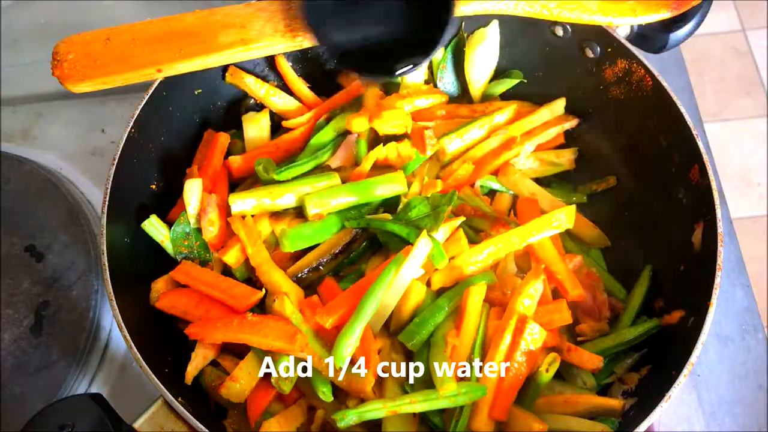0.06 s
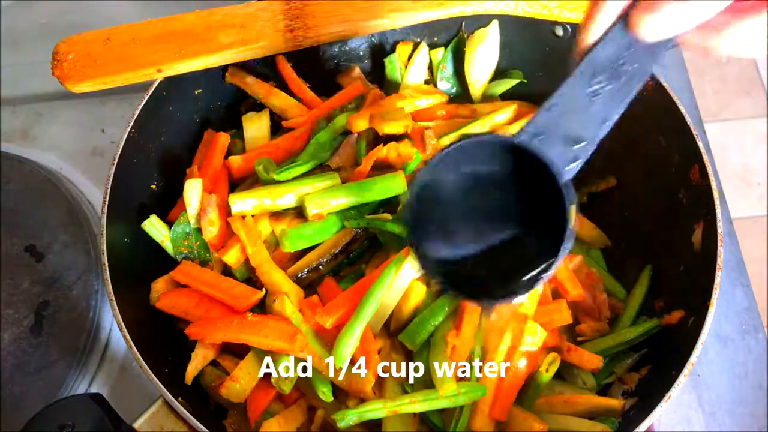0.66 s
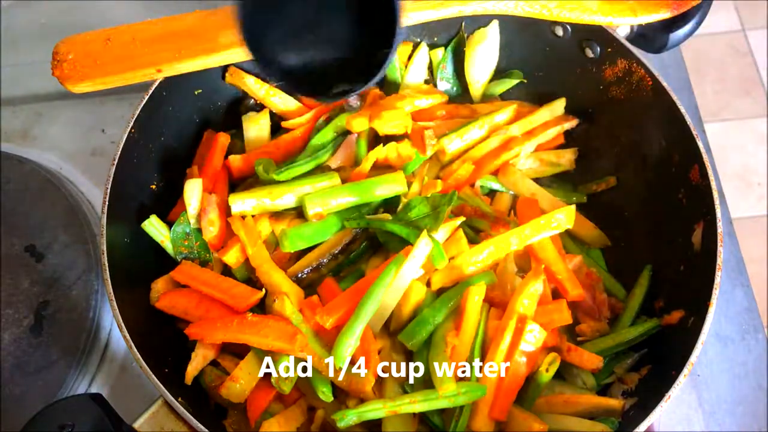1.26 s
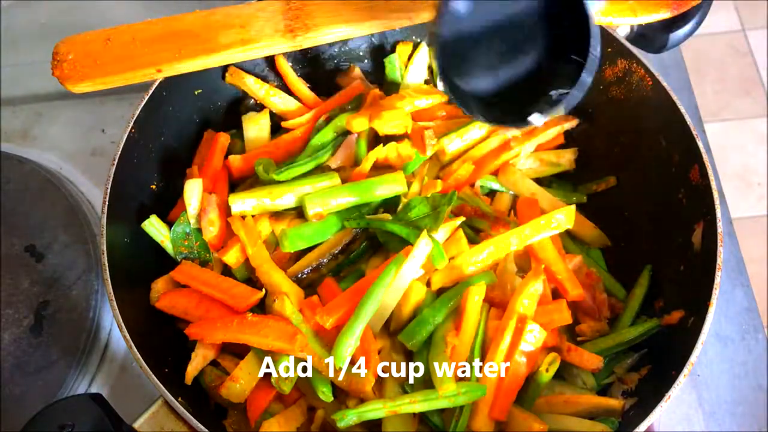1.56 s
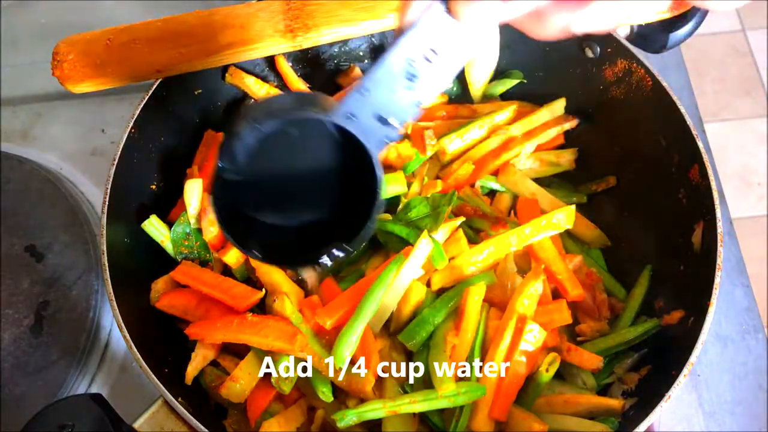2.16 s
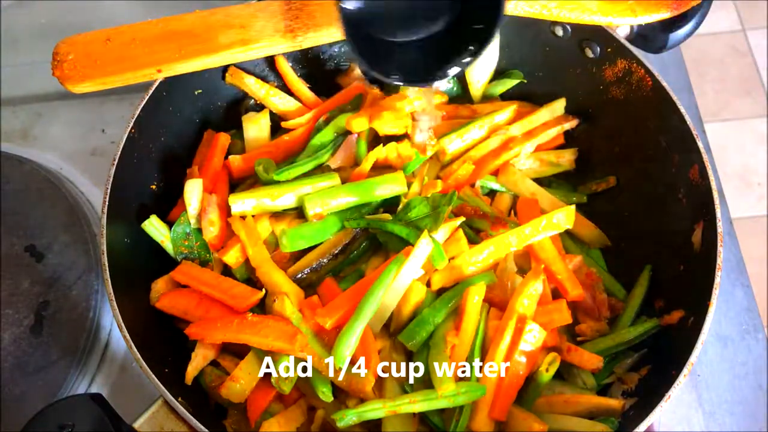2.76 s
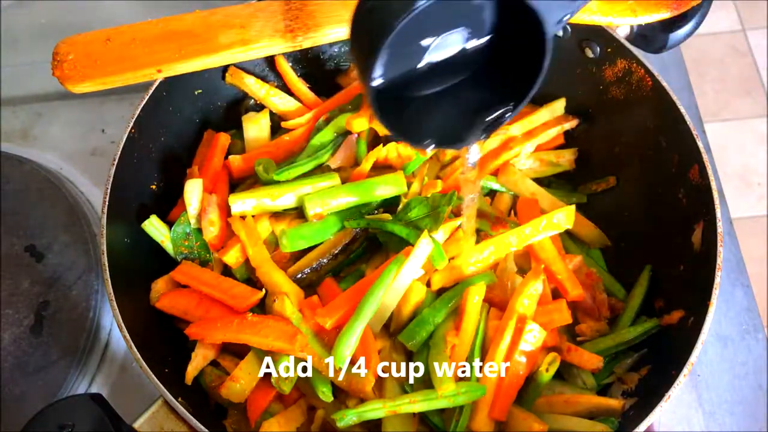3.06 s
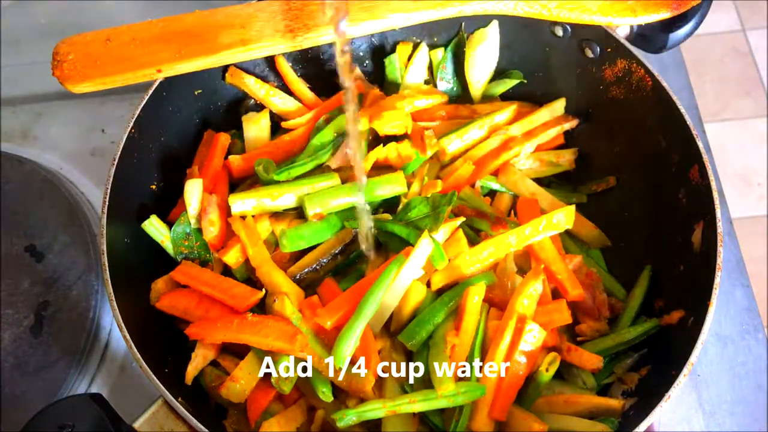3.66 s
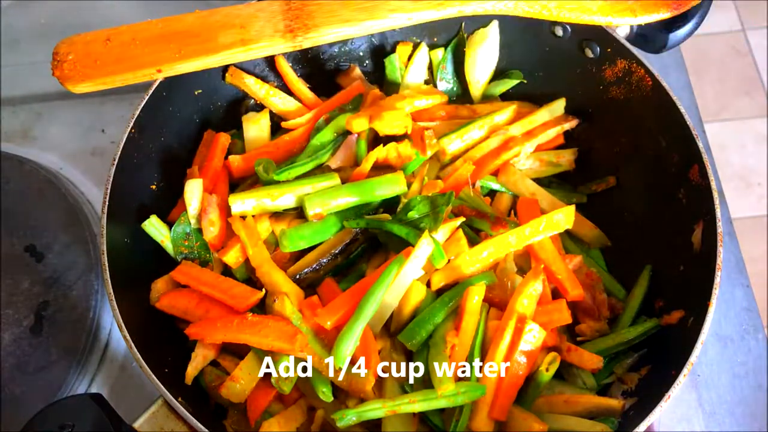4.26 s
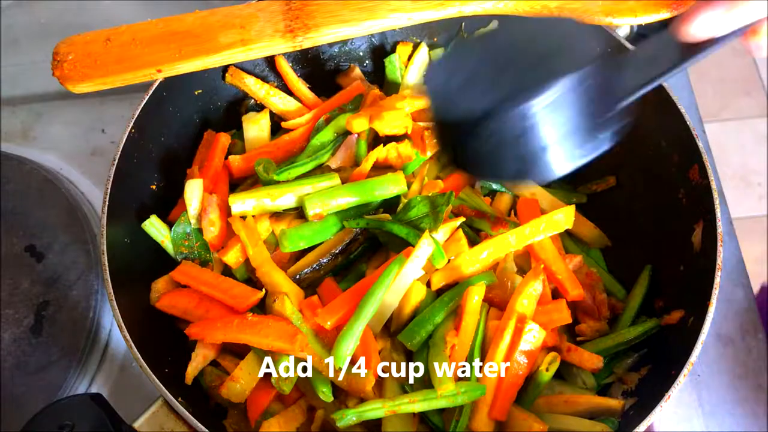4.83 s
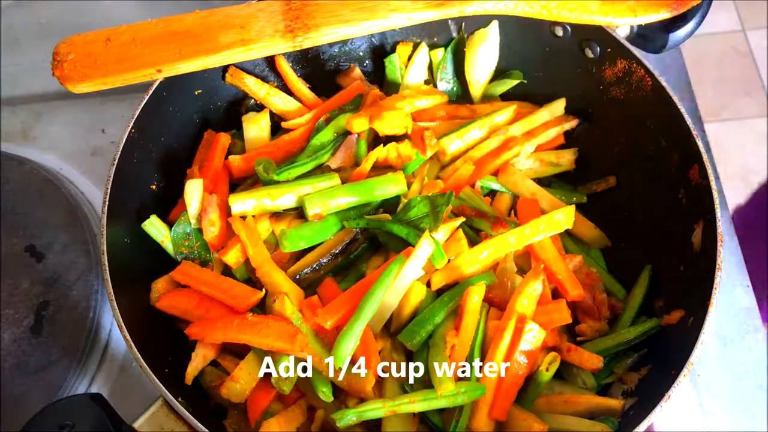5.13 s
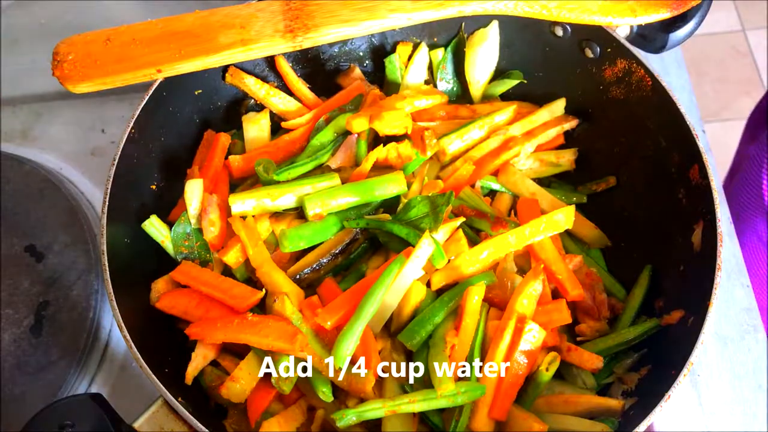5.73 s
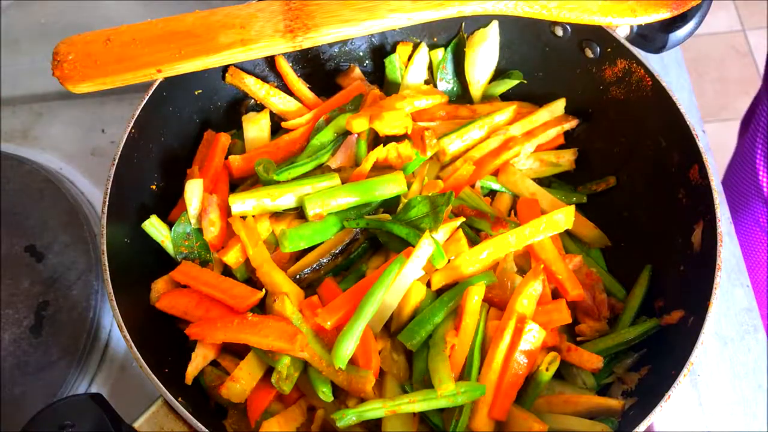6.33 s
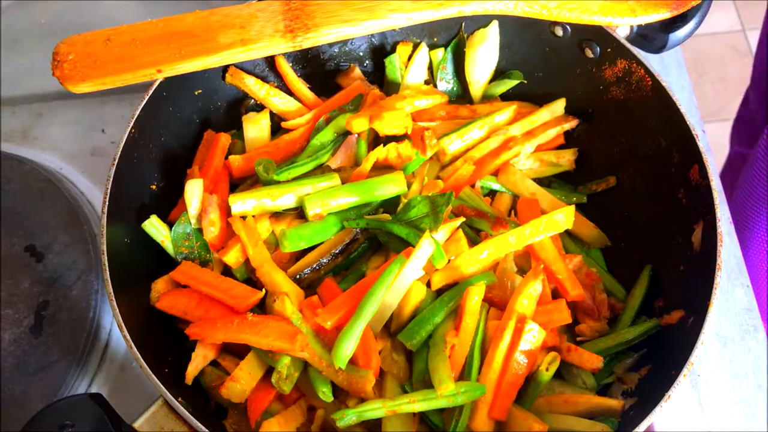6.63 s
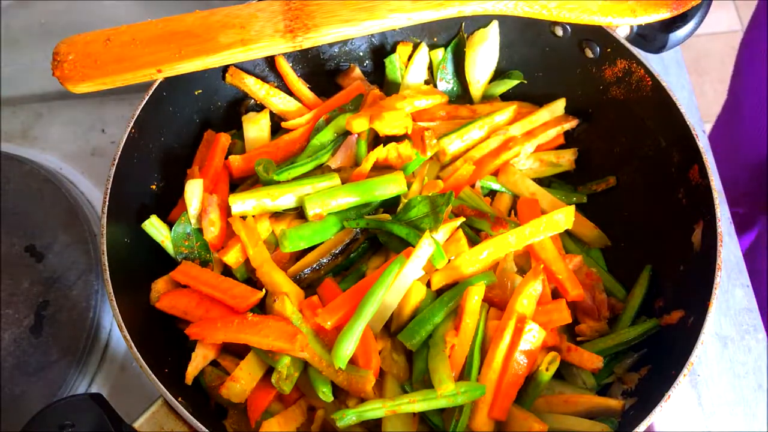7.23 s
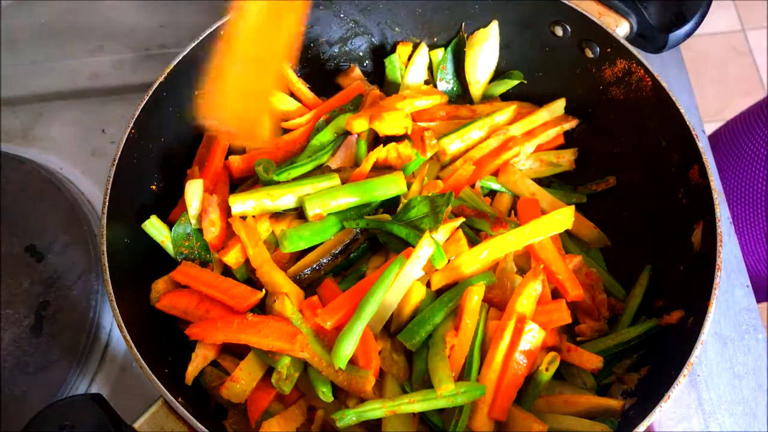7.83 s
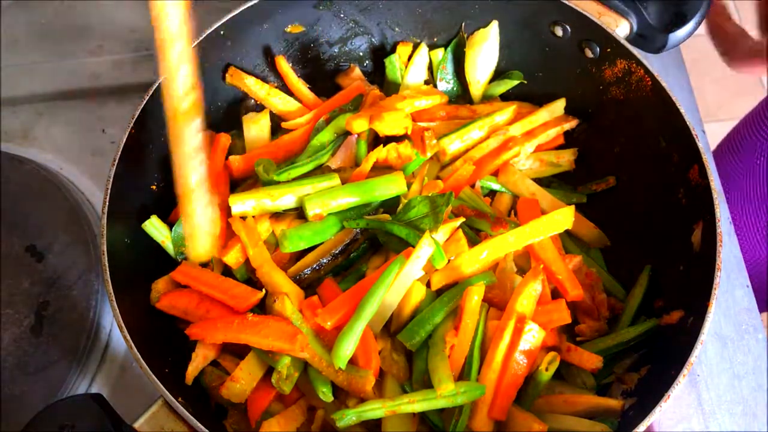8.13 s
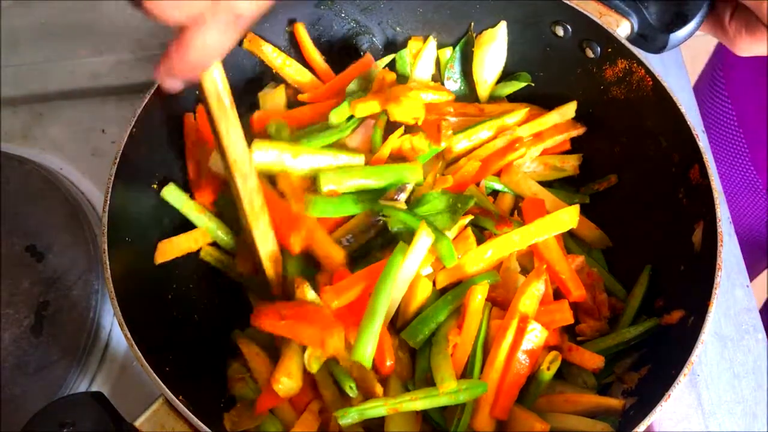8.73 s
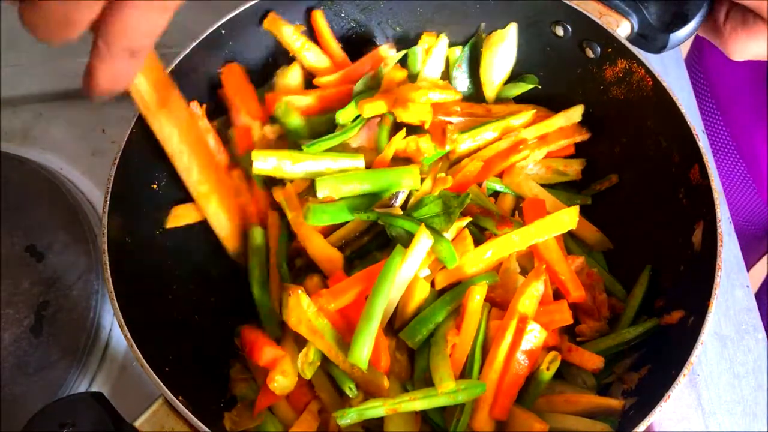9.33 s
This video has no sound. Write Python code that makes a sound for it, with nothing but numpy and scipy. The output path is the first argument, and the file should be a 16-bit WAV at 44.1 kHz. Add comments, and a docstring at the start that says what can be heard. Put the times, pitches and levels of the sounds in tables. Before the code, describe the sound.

Water sizzles and spits in a hot wok, slowly calming, as a plastic cup is set down and a wooden spatula knocks the pan.

```python
"""In a small kitchen, over a softly rumbling stove, a little water is poured on vegetables in a hot wok.
It boils, crackles and spits on the metal, then slowly calms down; the plastic measuring cup glugs once.
At about 6 s the cup is put down on the worktop with a thud that sets the wok ringing. It rocks and slips,
then its handle clacks. Near the end a wooden spatula pushes through the vegetables and knocks the pan."""
import sys
import numpy as np
from scipy import signal
from scipy.fft import rfft, irfft
from scipy.io import wavfile

SR = 44100
rng = np.random.default_rng(int(sys.argv[2]) if len(sys.argv) > 2 else 0)


def store_wav(level_fs):
    """Save 16-bit WAV to argv[1]."""
    pcm = np.round(np.clip(np.atleast_2d(level_fs), -1, 1) * 32767)
    wavfile.write(sys.argv[1], SR, pcm.T.astype(np.int16))


N = 422919
TIME_S = np.arange(N) / SR


def from_db(db):
    """Turn decibels into a number to multiply a sound by."""
    return 10 ** (np.asarray(db) / 20)


def rms_one(x):
    """Scale a signal so that its average strength (rms) is 1."""
    return x / np.sqrt(np.mean(x ** 2) + 1e-20)


def add(track, start_s, sound):
    """Mix a sound into the track at a given time."""
    at = int(np.clip(round(start_s * SR), 0, N - 1))
    track[at:at + len(sound)] += sound[:N - at]


def through(x, response):
    """Give every sample of x the same response, such as a tone colour or an echo."""
    return signal.oaconvolve(x, response)[:len(x)]


def filtered(x, edge_hz, kind, order=2):
    """Keep the "low" part of a sound, the "high" part, or a "band" between two edges."""
    return signal.sosfilt(signal.butter(order, edge_hz, kind, fs=SR, output="sos"), x)


def colour(spectrum, peaks=(), size=4096):
    """The response to one click that has the given tone curve, with peaks and dips on top; energy 1."""
    hz = np.maximum(np.arange(size // 2 + 1) * SR / size, 1)
    points = np.array(spectrum)
    db = np.interp(np.log(hz), np.log(points[:, 0]), points[:, 1])
    for centre, width, height in peaks:
        db = db + height / (1 + (2 * (hz - centre) / width) ** 2)
    # move the energy as early as it can go (minimum phase), so clicks stay sharp
    cepstrum = irfft(np.log(from_db(db)))
    cepstrum[1:size // 2] *= 2
    cepstrum[size // 2 + 1:] = 0
    response = irfft(np.exp(rfft(cepstrum)))
    return response / np.linalg.norm(response)


def drift(rate_hz):
    """A smooth random wobble, about 1 in size; a higher rate wobbles faster."""
    r = np.exp(-80 * np.pi * rate_hz / SR)
    slow = signal.lfilter([1], [1, -2 * r, r * r], rng.standard_normal(N // 40 + 2002))[2000:]
    return np.interp(np.arange(N) / 40, np.arange(len(slow)), rms_one(slow))


def ring(clicks, hz, fade_s):
    """Each click starts a pure tone. Here and below, fade_s is the time to die away by 60 dB."""
    r, turn = from_db(-60 / (fade_s * SR)), 2 * np.pi * hz / SR
    return signal.lfilter([0, np.sin(turn)], [1, -2 * r * np.cos(turn), r * r], clicks + 1e-18)


def struck(notes, detune=0.003):
    """A hit object rings with all its notes; their strength and pitch differ a little at every blow."""
    click, out = signal.unit_impulse(SR), np.zeros(SR)
    for k, (hz, db, fade_s) in enumerate(notes):
        level_luck, pitch_luck = rng.standard_normal(2)
        out += (-1) ** k * from_db(db + level_luck) * ring(click, hz * (1 + detune * pitch_luck), fade_s)
    return out


def dying_noise(fade_s, size=SR):
    """Many tiny echoes that blur together and die away; energy 1."""
    tail = rng.standard_normal(size) * from_db(-60 * np.arange(size) / SR / fade_s)
    return tail / np.linalg.norm(tail)


def random_clicks(per_s, spread_db, largest):
    """Many small clicks and a few large ones, up to `largest` steps of spread_db louder."""
    sizes = from_db(spread_db * np.minimum(rng.exponential(1, N), largest)) * rng.choice([-1, 1], N)
    return rms_one(sizes * (rng.random(N) < per_s / SR))


def chance_times(per_s):
    """Sample positions of events that come at random."""
    return np.flatnonzero(rng.random(N) < per_s / SR)


def pick_between(low, high):
    """A random value; every doubling in the range is equally likely."""
    return low * (high / low) ** rng.random()


def push(peak_s, rise_s, fall_s):
    """A force that grows from 0 to 1 and eases off again."""
    return np.interp(TIME_S, [peak_s - rise_s, peak_s, peak_s + fall_s], [0, 1, 0])


# tone of the stove: pitch_hz, relative_db
STOVE_TONE = [(20, -13), (40, -11), (61, 4.5), (77, -3.5), (98, 2.5), (125, 3), (165, -13), (205, -30),
              (278, 1.5), (345, -12), (390, -8), (460, -10.5), (900, -4.5), (3000, -53.5)]


def stove():
    """The stove rumbles: soft, steady, low noise."""
    return from_db(-57.5) * rms_one(through(rng.standard_normal(N), colour(STOVE_TONE, size=8192)))


# the boil comes up as water gathers in the pan, then sinks to a simmer: time_s, level_db
BOIL_LEVEL = [(0, -43), (.5, -42.5), (1.0, -39.5), (1.7, -39.5), (2.5, -40), (3.4, -41), (4.2, -42.5),
              (5.1, -44), (5.9, -45), (7.0, -46.2), (9.59, -46.5)]
# tone of the boil: pitch_hz, relative_db
BOIL_TONE = [(200, -41), (430, -33), (530, -7), (720, -7), (970, -4.5), (1150, -1.5), (1500, -0.5),
             (1670, -5.5), (2400, -10), (3500, -16), (7000, -39)]
# pitches that the wok's bowl and the air in it boost or weaken: pitch_hz, width_hz, boost_db
BOWL_PEAKS = [(445, 40, -5), (592, 75, 4), (700, 60, -4), (845, 82, 8.8), (968, 50, -5), (1160, 40, 2),
              (1235, 50, 4), (1568, 52, 4.5), (1630, 50, -3), (1912, 75, 3.5), (2172, 60, 2),
              (2390, 120, 2), (4720, 200, 2), (4980, 200, -3), (7600, 500, -1.5), (8350, 400, 2.5)]


def boiling(cycles=8.2, pitch_count=24):
    """Bubbles burst between the vegetables and ring a few cycles each, coloured by the bowl."""
    level_db = np.interp(TIME_S, *np.transpose(BOIL_LEVEL))
    per_s = 3500 * from_db(level_db - level_db.max() + 2 * drift(8))
    bursts = random_clicks(per_s, spread_db=2.5, largest=5.4)
    pitch_choice = rng.integers(0, pitch_count, N)
    bubbles = np.zeros(N)
    for k, hz in enumerate(np.geomspace(480, 4200, pitch_count)):
        bubbles += ring(bursts * (pitch_choice == k), hz, cycles / hz) * hz ** 1.5
    seethe = rms_one(bubbles) + from_db(2.5) * rng.standard_normal(N)
    return from_db(level_db) * rms_one(through(seethe, colour(BOIL_TONE, BOWL_PEAKS)))


# how hard the water fries, dying down as the pan cools; the next five sounds follow it: time_s, vigour_db
VIGOUR_CURVE = [(0.0, -1.5), (0.7, 0), (1.7, -0.5), (2.2, -2), (3.1, -4), (4.1, -8.5), (5.1, -11.5),
                (5.9, -13.5), (7.0, -14), (9.59, -14)]
# tone of the frying: pitch_hz, relative_db
FRY_TONE = [(200, -42), (450, -32), (900, -9), (1800, 1), (2800, 3), (4500, 2), (4900, -1), (5500, -0.5),
            (6800, -2.5), (7600, -9.5), (9500, -27), (16000, -35)]


def frying():
    """Tiny drops flash to steam on the metal: sharp clicks that thin out as the pan cools, over a hiss."""
    vigour_db = vigour()
    per_s = 7000 * from_db(1.1 * (vigour_db - vigour_db.max()))
    crackle = random_clicks(per_s, spread_db=3.4, largest=4.4) + from_db(-1) * rng.standard_normal(N)
    level_db = -39.44 + vigour_db + 1.47 * drift(31)
    return from_db(level_db) * rms_one(through(crackle, colour(FRY_TONE, BOWL_PEAKS)))


def vigour():
    """How hard the water fries at every sample, in dB; 0 is the hardest."""
    return np.interp(TIME_S, *np.transpose(VIGOUR_CURVE))


def fizzles(clicks, fade_s):
    """Each click becomes a tiny burst of hiss."""
    r = from_db(-120 / (fade_s * SR))
    energy = signal.lfilter([1], [1, -r], clicks ** 2 + 1e-18)
    return rms_one(np.sqrt(energy) * rng.standard_normal(N))


# tone of the spray: pitch_hz, relative_db
SPRAY_TONE = [(2000, -51), (5000, -7), (7600, -1), (8500, 3.5), (11500, 3), (12800, 0), (14000, -2.7),
              (16000, -3.7)]


def spray():
    """The finest droplets crackle very high, over a mist that sputters more unevenly as it thins."""
    level_db = -45 + 1.34 * vigour()  # the finest sounds die away fastest
    thinning_db = level_db.max() - level_db
    per_s = 260 * from_db(-0.6 * thinning_db + 4 * drift(14))
    ticks = fizzles(random_clicks(per_s, spread_db=5, largest=3.8), fade_s=0.008)
    sputter_db = 1.1 + 0.07 * thinning_db
    edges_hz = np.geomspace(5000, 16000, 7)
    shared_wobble, mist = drift(70), np.zeros(N)
    for low, high in zip(edges_hz, edges_hz[1:]):
        hiss = filtered(rng.standard_normal(N), [low, high], "band")
        mist += hiss * from_db(sputter_db * (shared_wobble + drift(35)))
    droplets = ticks + from_db(2) * rms_one(mist)
    waver_db = 0.7 * sputter_db * drift(8)
    return from_db(level_db + waver_db) * rms_one(through(droplets, colour(SPRAY_TONE)))


def snapping_bubbles(low_hz=2230, high_hz=12000, cycles=19.3, echo_db=9.5, echo_fade_s=0.073, size=2048):
    """Single small bubbles snap out of the sizzle, each with its own pitch and brief echo in the bowl."""
    out = np.zeros(N)
    fade = from_db(-60 * np.arange(size) / SR / echo_fade_s)
    for at in chance_times(per_s=130):
        hz = pick_between(low_hz, high_hz)
        snap = from_db(echo_db) * rng.standard_normal(size) * fade / np.linalg.norm(fade)
        snap[0] = 1  # the click itself, ahead of its echo
        db = -1.5 * np.log2(hz / low_hz) + 0.99 * rng.standard_normal()
        add(out, at / SR, from_db(db) * ring(snap, hz, cycles / hz))
    return from_db(-49 + 0.45 * vigour()) * rms_one(out)


def steam_jets(low_hz=2600, high_hz=13500, half_width_octaves=0.077):
    """Steam squirts from under the vegetables: narrow hisses, each with its own pitch and length."""
    out, vigour_db = np.zeros(N), vigour()
    t = np.arange(SR // 10) / SR
    for at in chance_times(per_s=12):
        swell_s = pick_between(0.005, 0.013)
        swell = np.exp(-0.5 * ((t - t.mean()) / swell_s) ** 2)
        hz = pick_between(low_hz, high_hz)
        db = -44 + 0.77 * vigour_db[at] - 4 * np.log2(hz / low_hz)  # lower jets are louder
        band_hz = [hz * 2 ** -half_width_octaves, hz * 2 ** half_width_octaves]
        hiss = rms_one(filtered(rng.standard_normal(len(t)), band_hz, "band"))
        add(out, at / SR, from_db(db) * hiss * swell)
    return out


def drop(hz, spread_octaves, fade_s):
    """One drop bursts with a snap and a short spit, which bounce round the bowl."""
    grid_hz = np.geomspace(200, 20000, 30)
    # a hump of energy around the drop's pitch; small drops are higher
    distance = np.log2(grid_hz / hz) / (1.6 * spread_octaves)
    hump_db = -40 * np.log10(1 + distance ** 2) - 10 * np.log10(grid_hz / hz)
    echo_db = 1.5 - 2.5 * np.log2(max(hz / 3000, 1))  # high drops echo less
    burst = dying_noise(fade_s, SR // 10) + from_db(echo_db) * dying_noise(0.1, SR // 10)
    burst[0] = from_db(-2.5)  # the snap
    pop = through(burst, colour(np.column_stack([grid_hz, hump_db]), size=1024))
    return np.sqrt(0.005 * SR) * pop / np.linalg.norm(pop)  # as much energy as 5 ms at strength 1


# the largest drops on the hot metal: start_s, level_db, pitch_hz, spread_octaves, fade_s
BIG_DROPS = [(0.37, -35, 6400, 1.1, .006), (0.8958, -29.5, 1870, 0.57, .012),
             (1.799, -36, 11000, 0.28, .008), (2.0635, -41, 11000, .5, .008),
             (2.2973, -36, 3200, 1.1, .004), (2.503, -37, 10500, 0.48, .008),
             (2.580, -34, 5000, 1.5, 0.0073), (2.633, -41, 3500, 0.53, .005), (2.774, -36, 5000, .7, .008),
             (3.089, -33, 1500, 0.46, .012), (3.2115, -31.5, 3900, 1.1, 0.005),
             (3.216, -34, 9800, 0.45, .005), (3.427, -36.5, 4500, 1.1, .02),
             (3.4816, -41.5, 5800, .4, .006), (3.5252, -31.5, 2500, 0.86, .025),
             (3.546, -34.5, 1700, 0.83, .008), (3.589, -38.5, 6600, 1.2, .007),
             (3.6038, -43, 12500, .4, .005), (3.851, -38, 3480, .25, .008), (3.8755, -41, 13000, .35, .012),
             (3.960, -39, 1600, 0.67, .006), (4.033, -39, 8500, 1.7, .006), (4.082, -34, 2400, 0.6, 0.0069),
             (4.188, -45, 10600, 0.26, .005), (4.2271, -33.5, 2040, 0.7, .007),
             (4.2399, -40, 3500, 1, .006), (4.4965, -47, 11500, 0.65, .005),
             (4.501, -44, 12000, 0.36, .008), (4.5297, -49, 11500, .45, .005),
             (4.544, -41, 9000, 1.1, .005), (4.7492, -36.5, 4700, 0.36, 0.0052),
             (4.9203, -50, 9500, .3, .005), (5.037, -54, 9500, .3, .006), (5.156, -49, 5500, .6, .005),
             (5.343, -45, 6500, 1.4, 0.017), (5.4117, -44, 5430, .3, .007), (5.451, -42, 3700, 0.56, .006),
             (5.5294, -48, 12500, 0.38, .005), (5.5776, -46, 8700, .25, .005),
             (5.596, -35, 1900, 0.54, 0.014), (5.893, -41, 3500, 1.2, 0.013),
             (6.0196, -35.5, 3000, 0.93, .005), (6.263, -42, 1700, 1.2, 0.013),
             (6.571, -34.5, 1740, 0.97, 0.011), (6.6454, -42, 2400, 0.88, 0.0068),
             (6.8636, -43.5, 4500, 0.77, .01), (6.892, -42, 4900, .35, .02), (7.054, -49.5, 7000, 1, .006),
             (7.104, -45.5, 4500, 1.1, .005), (7.2045, -42.5, 4800, 0.099, .008),
             (7.2256, -52, 14800, .12, .005), (7.2562, -37, 4240, 0.8, .005),
             (7.313, -38, 1400, 0.71, .012), (7.3395, -49, 14000, .25, .005),
             (7.361, -45, 4000, 0.97, .005), (7.5456, -48, 5460, .35, .005), (7.6576, -50, 6300, .4, .006),
             (7.683, -48, 5000, .35, .006), (7.7135, -46, 5000, 1.3, .005), (7.8238, -48, 13000, .4, .005),
             (8.0834, -48, 5300, 0.44, .005), (8.198, -45.5, 11000, 0.65, .005),
             (8.3834, -40, 5400, 0.61, 0.0046), (8.4957, -52, 8300, .4, .005),
             (8.7875, -52, 9000, .4, .005), (8.977, -40, 5600, 0.38, 0.0055),
             (9.093, -43.5, 9000, .65, .004)]


def popping_drops():
    """Large drops spit loudly; smaller ones come at random and weaken as the pan cools."""
    out, vigour_db = np.zeros(N), vigour()
    for start_s, db, hz, spread_octaves, fade_s in BIG_DROPS:
        add(out, start_s, from_db(db) * drop(hz, spread_octaves, fade_s))
    for at in chance_times(per_s=9):
        hz = pick_between(4000, 14000)
        db = -45 + 0.82 * vigour_db[at] + 2.6 * rng.standard_normal()
        add(out, at / SR, from_db(db) * drop(hz, spread_octaves=0.36, fade_s=0.0039))
    return out


def gulp(start_s=2.777, start_hz=291, fade_s=0.071):
    """A gulp of air as the water leaves the cup: one soft, low glug that sags in pitch."""
    out, t = np.zeros(N), np.arange(SR // 4) / SR
    hz = start_hz * (0.71 + 0.29 * np.exp(-t / 0.026))
    loudness = from_db(-29 - 60 * t / fade_s) * (1 - np.exp(-t / 0.012))
    add(out, start_s, loudness * np.sin(2 * np.pi * np.cumsum(hz) / SR))
    return out


# tone of the worktop's thud: pitch_hz, relative_db
WORKTOP_TONE = [(40, -43), (120, 5.5), (200, -3), (360, -0.5), (500, 1.5), (650, 7.5), (900, 5.5),
                (1600, 5.5), (2300, 0), (3500, -4), (9000, 19), (16000, 23)]
# hollow notes of the worktop panel and the gaps between them: pitch_hz, width_hz, boost_db
PANEL_PEAKS = [(195, 50, -9), (483, 110, 6), (675, 100, 2), (880, 80, 5), (990, 70, -2), (1120, 80, 7),
               (1410, 200, 3), (1640, 63, 10), (1930, 110, 2)]
# the notes the wok rings with: pitch_hz, relative_db, fade_s
WOK_NOTES = [(113, -9, 0.45), (138, -5, 0.31), (278.4, -9, 1), (397, -4, 0.19), (559, -4, 0.5),
             (690, -6, 0.23), (872, 5, 0.48), (1095, 2, 0.46), (1140, 2, 0.35), (1525, -5, 0.96),
             (1630, -2, 0.22), (1900, -11, 0.5), (2400, -3, .28), (3200, -2, 0.18), (3425, 3.5, 0.16),
             (3530, 0, 0.18), (4220, -6, .24), (4580, -2, 0.23), (4640, -2, .2), (5846, 1, 0.16),
             (5880, -3, 0.2), (6400, -1, .14), (6570, -6, 0.2), (7500, -5, 0.17), (8150, -7, .15),
             (9318, -8, 0.22)]


def dull_blow(cutoff_hz, ring_db, boom_delay_s=0.0139):
    """The worktop thuds, the wok on the stove rings along, and the cabinet below booms late and low."""
    thud = through(dying_noise(fade_s=0.067), colour(WORKTOP_TONE, PANEL_PEAKS))
    thud = filtered(thud, cutoff_hz, "low")
    boom = filtered(dying_noise(fade_s=0.22), [85, 150], "band")
    boom = np.pad(boom, (int(boom_delay_s * SR), 0))[:SR]
    return (from_db(22) * thud / np.linalg.norm(thud)
            + from_db(ring_db - 15) * struck(WOK_NOTES)
            + from_db(11.5) * boom / np.linalg.norm(boom))


# the cup lands, then tips over: start_s, force_db, cutoff_hz, relative_ring_db, hollow_note_db
CUP_LANDINGS = [(5.9338, -26.5, 1800, -2, -31), (5.9414, -25, 1050, -4, -24), (6.125, -51, 750, -2, -43),
                (6.182, -48, 750, -4, -36), (6.207, -39, 150, -16, -55)]
# the notes of the cup's hollow: pitch_hz, relative_db, fade_s
HOLLOW_NOTES = [(462, -16, 0.084), (610, 0.5, 0.087), (688, -9, 0.11)]


def cup_landings(contacts=4, gap_s=0.023, loss_db=5):
    """The cup lands with a hollow note and rocks to rest, each contact weaker and duller than the last."""
    out = np.zeros(N)
    for start_s, force_db, cutoff_hz, ring_db, hollow_db in CUP_LANDINGS:
        add(out, start_s, from_db(hollow_db) * struck(HOLLOW_NOTES))
        for k in range(contacts):
            contact = dull_blow(cutoff_hz * 0.8 ** k, ring_db if k == 0 else ring_db - 8)
            add(out, start_s + k * gap_s, from_db(force_db - k * loss_db) * contact)
    return out


# the cup's slips on the worktop: peak_s, level_db, rise_s, fall_s
CUP_SLIPS = [(5.946, -42, 0.012, 0.075), (6.125, -46.5, 0.18, 0.12), (6.26, -50, .03, 0.068)]
# tone of the scrape: pitch_hz, relative_db
SCRAPE_TONE = [(1000, 2), (2500, -8), (4600, -8.5), (7000, -13), (9400, -6.5), (11000, -4.5), (16000, -16)]
# what rings as the cup slips: pitch_hz, width_hz, boost_db
SCRAPE_PEAKS = [(2500, 120, 7), (3200, 78, 18), (3360, 87, 17), (3550, 110, 7.1), (4220, 80, 12),
                (4770, 98, 18), (5800, 100, 19), (6600, 130, 9), (7560, 130, 10), (8150, 150, 8),
                (8860, 150, 6), (9350, 150, 9)]


def cup_slips():
    """The cup slips over the worktop in a quick run of tiny catches that make it ring roughly."""
    force = sum(from_db(db) * push(peak_s, rise_s, fall_s) for peak_s, db, rise_s, fall_s in CUP_SLIPS)
    chatter = from_db(2.5 * drift(80))
    catches = random_clicks(per_s=2500, spread_db=1, largest=3)
    return through(force * chatter * catches, colour(SCRAPE_TONE, SCRAPE_PEAKS))


# the handle hits the worktop: start_s, level_db
HANDLE_HITS = [(6.3874, -25), (6.3886, -21), (6.3918, -21.5)]
# the short notes of the plastic: pitch_hz, relative_db, fade_s
PLASTIC_NOTES = [(1427, -1, 0.053), (2380, -5, 0.025), (2760, -9, 0.014), (3440, -5.5, 0.0088),
                 (4040, -7.5, 0.0091), (4800, -0.5, 0.0066), (5900, -9, 0.01), (6700, -10, 0.0059),
                 (8600, -19, 0.014), (9800, -13, 0.0081), (11800, -18, .007), (13800, -20, .006)]


def handle_clacks():
    """The cup's handle drops on the worktop, and each hard contact makes the plastic ring briefly."""
    out = np.zeros(N)
    for start_s, db in HANDLE_HITS:
        add(out, start_s, from_db(db) * struck(PLASTIC_NOTES))
    return out


# the spatula pushes through the vegetables: peak_s, force_db
SPATULA_STROKES = [(7.7, -4), (8.38, 0), (8.72, -2.5), (9.1, -3)]
# tone of the pan being rubbed and rocked: pitch_hz, relative_db
RUMBLE_TONE = [(25, -24), (60, 2), (90, 3), (115, 0), (200, -17), (300, -9), (700, -18), (2000, -20),
               (8000, -32)]


def stirring():
    """Wood and vegetables shuffle over the pan and rock it on the stove: a lumpy, low rumble."""
    force = sum(from_db(db) * push(peak_s, rise_s=0.19, fall_s=0.23) for peak_s, db in SPATULA_STROKES)
    bumps = random_clicks(per_s=370, spread_db=4.5, largest=3.4)
    return from_db(-56.5) * force * rms_one(through(bumps, colour(RUMBLE_TONE)))


# the spatula meets the pan: start_s, knock_db, thud_db
SPATULA_HITS = [(7.729, -46, -47), (8.338, -40, -41), (9.1179, -30, -41), (9.1209, -34.5, -38.5),
                (9.269, -40, -58)]
# the notes of the wooden knock: pitch_hz, relative_db, fade_s
WOOD_NOTES = [(290, -17, 0.091), (600, -11, 0.012), (980, -6, 0.037), (1173, 0.5, 0.035), (1410, -5, 0.025),
              (1690, -5, 0.028), (2140, -8, 0.028), (2730, -11, 0.05), (3500, -3, 0.0093),
              (6500, -10, .008)]


def spatula_taps():
    """The wooden spatula knocks the pan and jolts it on the stove, which answers with a short rumble."""
    out = np.zeros(N)
    for start_s, knock_db, thud_db in SPATULA_HITS:
        jolt = from_db(14) * through(dying_noise(fade_s=0.23), colour(RUMBLE_TONE))
        knock = from_db(knock_db) * struck(WOOD_NOTES)
        thud = from_db(thud_db) * (dull_blow(cutoff_hz=900, ring_db=-16) + jolt)
        add(out, start_s, knock + thud)
    return out


def kitchen_echo(x, fade_s=0.29, delay_s=0.005):
    """Sound bounces back from the walls, a little late and dull."""
    tail = filtered(dying_noise(fade_s), 7000, "low", order=1)
    return through(x, np.pad(tail, (int(delay_s * SR), 0)))


def scene():
    """The wok and the thuds sound close; the cup's clacks and slips are farther off, with more echo."""
    rumble = stove()
    far = handle_clacks() + cup_slips()
    near = gulp() + spatula_taps() + stirring() + cup_landings()
    near += boiling() + frying() + spray() + snapping_bubbles() + popping_drops() + steam_jets()
    echo = kitchen_echo(from_db(-11) * near + from_db(-3.5) * far)
    return (near + far + rumble + echo)[None]


def record(dry):
    """The microphone loses the deepest bass and the very top; its opening makes a narrow treble dip."""
    opening = colour([(20, 0), (20000, 0.0051)], peaks=[(10420, 680, -5.5)], size=1024)
    heard = filtered(through(dry[0], opening), 40, "high")
    top_cut = signal.ellip(12, 0.1, 80, 15750, fs=SR, output="sos")
    return signal.sosfilt(top_cut, heard)[None]


dry = scene()
out = record(dry)
store_wav(out)
```